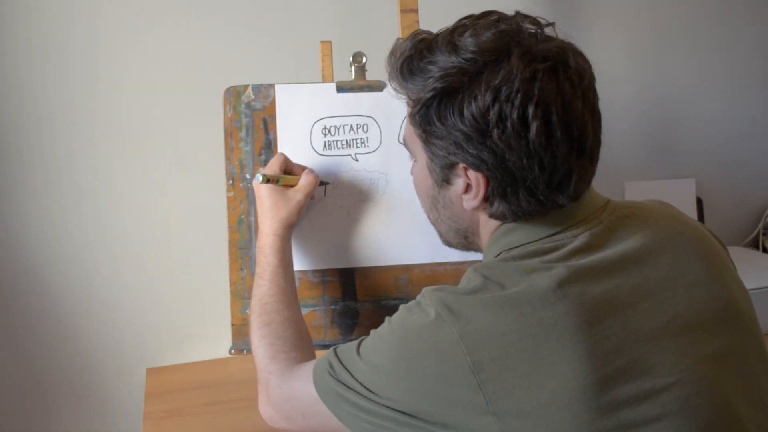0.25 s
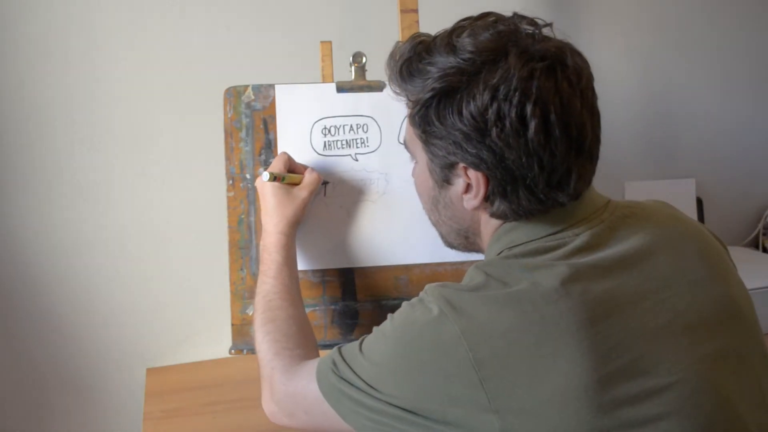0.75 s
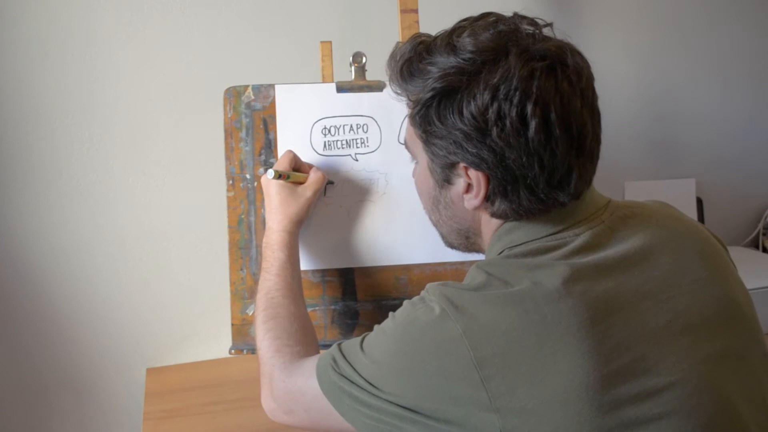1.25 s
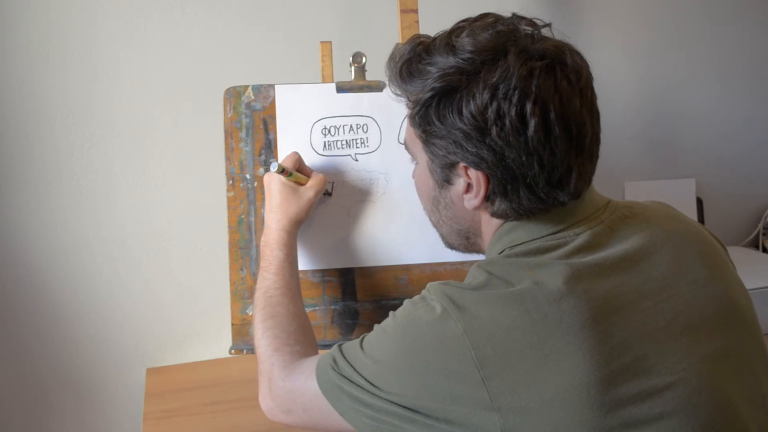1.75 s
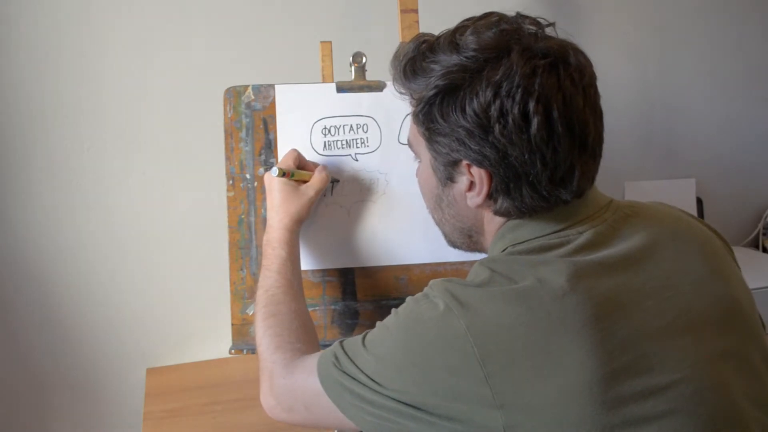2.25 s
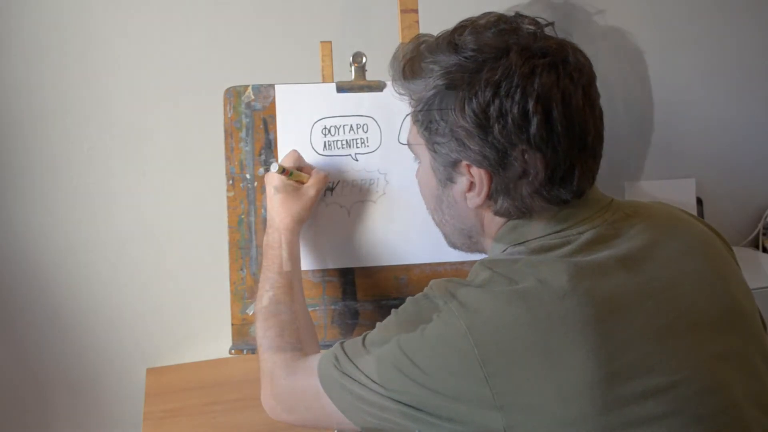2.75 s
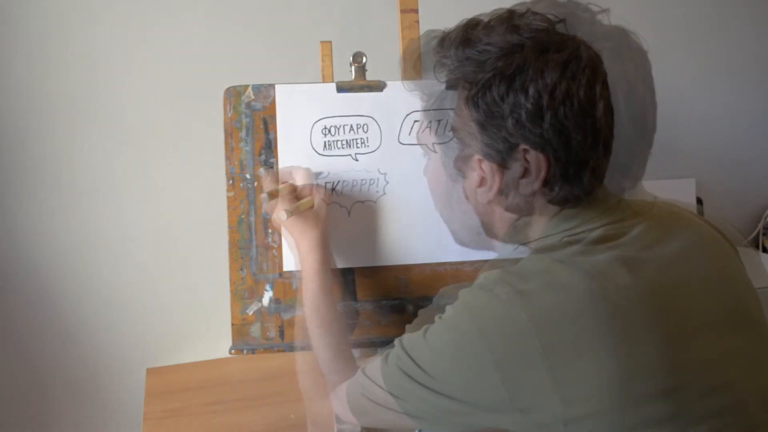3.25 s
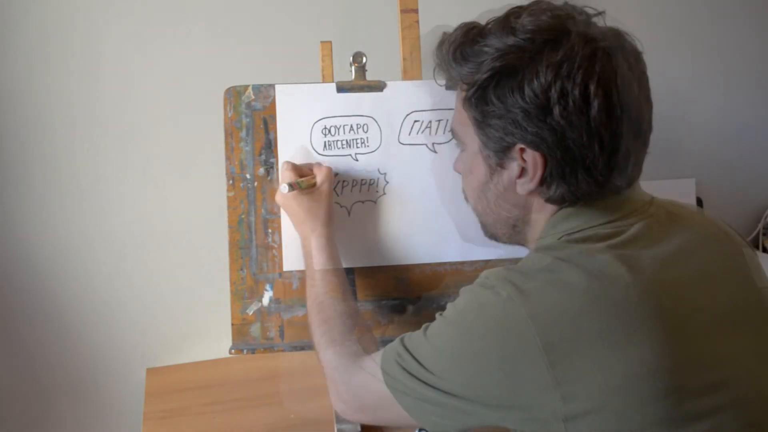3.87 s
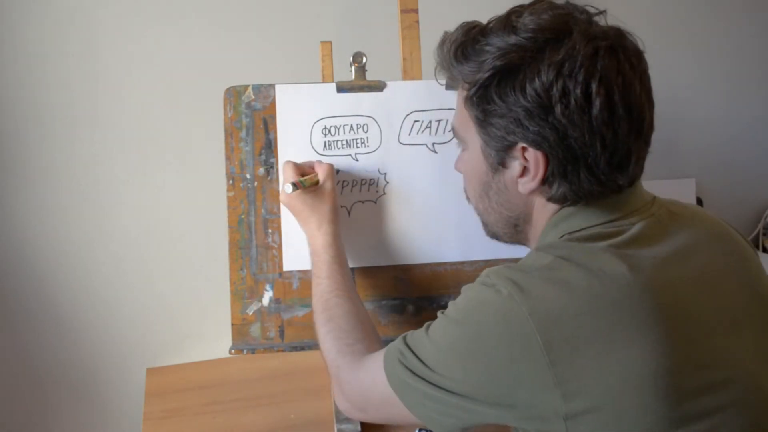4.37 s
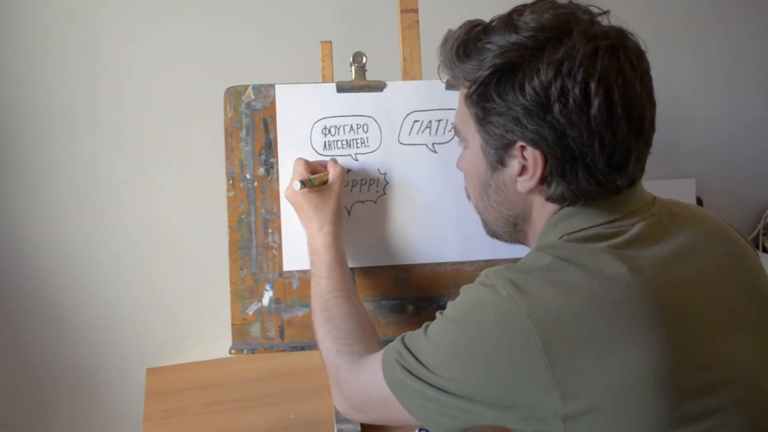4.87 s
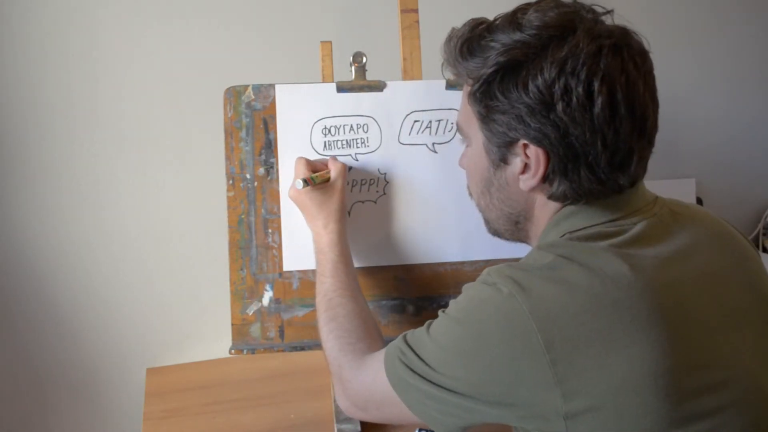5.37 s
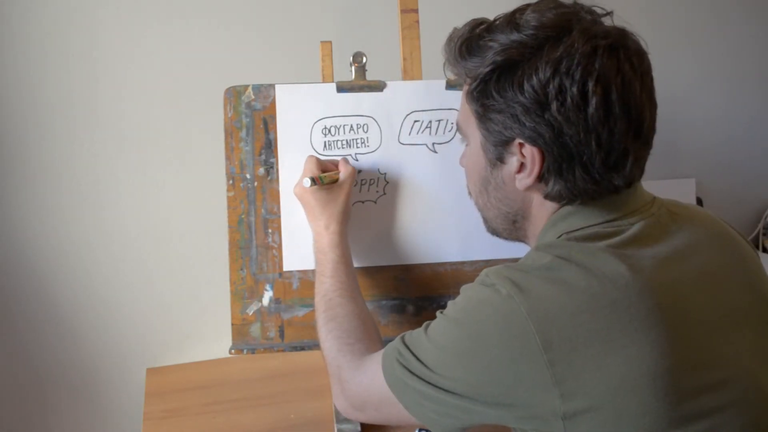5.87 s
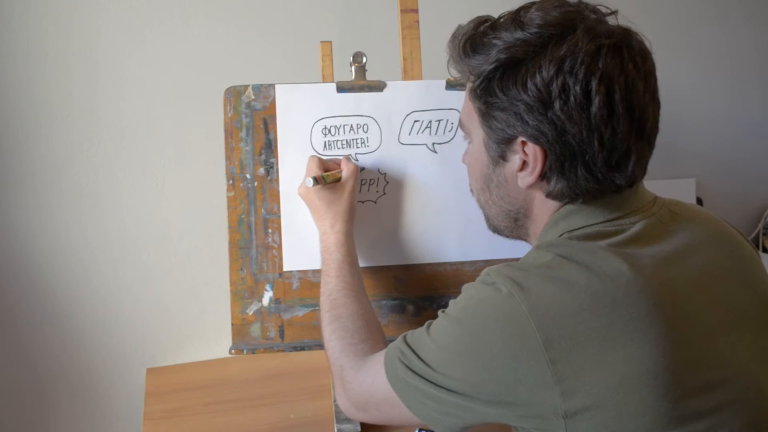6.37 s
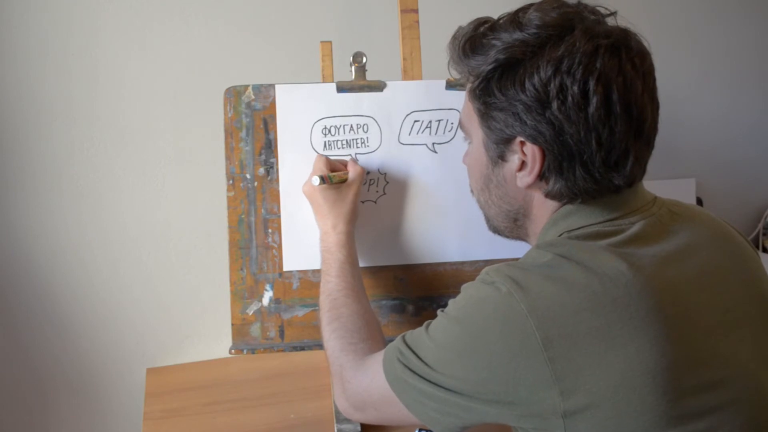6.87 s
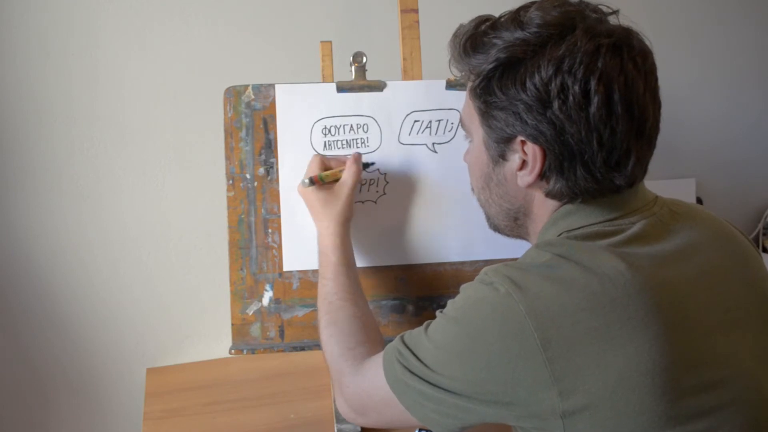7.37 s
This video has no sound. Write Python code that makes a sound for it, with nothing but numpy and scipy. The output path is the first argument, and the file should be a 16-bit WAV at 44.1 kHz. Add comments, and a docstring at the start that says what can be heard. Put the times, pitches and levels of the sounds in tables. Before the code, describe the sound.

A felt-tip marker scratches short dry strokes on board-backed paper in a quiet room, with one sharp knock early, then longer, stronger strokes.

```python
"""A felt-tip marker draws short strokes on paper clipped to a wooden board on an easel, in a small quiet room.
Snags on the paper fibres make noise: it hisses at the nib and, filtered by the board's modes, rings as drag.
Pen and hand knock on the board now and then, once sharply: filtered pushes with a noise rattle.
The hand rubs dully over the sheet. Soft room air and a faint high whirr are shaped noise."""
import sys
import numpy as np
from scipy import signal
from scipy.fft import rfft, irfft
from scipy.io import wavfile

SR = 44100
rng = np.random.default_rng(int(sys.argv[2]) if len(sys.argv) > 2 else 0)


def generate_wav(sig):
    """Save sig (samples, or channels by samples) to the path in sys.argv[1] as 16-bit PCM at SR."""
    pcm = np.round(np.clip(np.atleast_2d(sig).T, -1, 1) * 32767).astype(np.int16)
    wavfile.write(sys.argv[1], SR, pcm)


N = 335772

# Marker strokes; levels are relative. Each row: start in seconds, end in seconds, nib hiss in dB,
# board drag in dB, attack in seconds, release in seconds, pressure gained over the stroke in dB,
# chatter pitch in Hz, chatter in dB against the peak push.
STROKES = [(-.01, 0.081, -62.5, -64, 0.0088, 0.028, -14, 1290, -4),
           (0.672, 0.874, -66.5, -56, 0.023, 0.058, -1.5, 1180, -19),
           (1.419, 1.752, -60, -57.5, 0.017, 0.057, -1, 1020, -18),
           (2.434, 2.739, -63.5, -57.5, 0.087, 0.075, 0, 1230, -7),
           (2.74, 2.96, -75, -67, 0.024, 0.026, -3, 1200, -9),
           (2.938, 3.11, -64.5, -59.5, 0.11, 0.029, -14, 1180, -3),
           (3.355, 3.475, -61.5, -63, 0.0082, 0.056, -2, 5500, -3),
           (3.636, 3.983, -53.5, -47.5, 0.077, 0.033, 3, 2280, -9),
           (4.435, 4.997, -58.5, -49, 0.0087, 0.059, 12, 845, -8.5),
           (5.35, 5.5, -76, -68.5, .01, .01, 7, 845, -2),
           (5.496, 6.022, -59, -49.5, 0.033, .04, 8.5, 845, -5.5),
           (6.549, 7.31, -63.5, -51, 0.028, 0.089, 8.5, 845, -9.5)]
# Pen resonances on which the nib chatters in every stroke.
# Each row: frequency in Hz, level in dB against the nib speed gain.
NIB = [(2200, -8.5), (2930, -2), (5500, -11.5)]
# Spectrum of the nib hiss. Each row: frequency in Hz, relative density in dB per Hz.
HISS_SPECTRUM = [(200, -22), (700, -14), (1300, -7.5), (2200, 1), (3000, 5), (3500, 2), (4600, -2),
                 (5500, 0.5), (6400, -6), (7900, -16), (8600, -8.5), (10000, -9), (14500, -19.5),
                 (16000, -11.5)]
# Filter on the board drag. Each row: frequency in Hz, gain in dB.
DRAG_SPECTRUM = [(80, -37), (200, -18), (290, -2), (380, -9.5), (650, -2), (850, -1), (1200, 1.7),
                 (1900, 0.6), (2900, -3.5), (3600, -5), (5000, -13), (8000, -22), (16000, -67)]
UNSTEADY_DB, UNSTEADY_PER_S = 0.3, 22  # the hand never moves quite evenly


def marker(hiss_db=6.0, drag_db=1.5, nib_chatter_db=0.0):
    """Each stroke hisses at the nib, drives the board and chatters on its own pitch, most where pressed hardest."""
    speed, pressure, stroke_tone = np.zeros((3, N))
    t = np.arange(N) / SR
    for start, end, *shape, chatter_hz, chatter_db in STROKES:
        span = (t >= start) & (t < end)
        nib, push = stroke_gains(t[span], start, end, *shape)
        speed[span] += nib
        pressure[span] += push
        tone_gain = from_db(chatter_db) * push ** 2 / push.max()
        stroke_tone[span] += tone_gain * chatter(chatter_hz, size=SR)[-len(push):]
    nib_tone = sum(from_db(db + nib_chatter_db) * chatter(hz, size=N) for hz, db in NIB)

    nib_slips = fibre_slips(per_s=14000, spread_db=7.0, clump_db=3.5)
    hiss = rms_one(colour(nib_slips, HISS_SPECTRUM))
    drag_slips = fibre_slips(per_s=3000, spread_db=1.0, clump_db=2.5)
    drag = rms_one(colour(board(drag_slips, ring_db=23), DRAG_SPECTRUM))

    at_nib = speed * (from_db(hiss_db) * hiss + nib_tone)
    on_board = from_db(drag_db) * pressure * drag
    unsteady = from_db(UNSTEADY_DB * drift(UNSTEADY_PER_S))
    return unsteady * (at_nib + on_board + stroke_tone)


TOUCH_S, TOUCH_SHARE = 0.0047, 0.43  # landing time; share of full speed at which the attack starts
HISS_FOLLOWS = .27  # share of the pressure swing (in dB) that the hiss follows
ARCH_DB = 3.5  # pressure in mid-stroke above that at the ends


def stroke_gains(t, start, end, hiss_db, drag_db, attack_s, release_s, build_db):
    """The nib lands, speeds up, holds and lifts off while the pressure changes: gains of hiss and drag."""
    landed = np.clip((t - start) / TOUCH_S, 0, 1)
    speeding_up = np.clip(TOUCH_SHARE + (1 - TOUCH_SHARE) * (t - start) / attack_s, 0, 1)
    lifting_off = np.clip((end - t) / release_s, 0, 1)
    speed = landed * speeding_up * lifting_off
    progress = np.clip((t - start) / (end - start), 0, 1)
    press_db = build_db * (progress - .5) + ARCH_DB * (np.sin(np.pi * progress) - .5)
    return speed * from_db(hiss_db + HISS_FOLLOWS * press_db), speed * from_db(drag_db + press_db)


def fibre_slips(per_s, spread_db, clump_db):
    """Felt snags and lets go: dense clicks of uneven size, clumped by the tooth of the paper."""
    slips = (rng.random(N) < per_s / SR) * rng.standard_normal(N)
    return slips * from_db(spread_db * rng.standard_normal(N) + clump_db * drift(180))


def chatter(hz, size, relative_width=0.042):
    """Stick and slip lock loosely onto a resonance of pen or board: a rough, faint tone."""
    width_hz = relative_width * hz
    narrow = resonance(rng.standard_normal(size), hz, width_hz)
    return rms_one(resonance(narrow, hz, 4 * width_hz))


# Modes of board and easel.
# Each row: frequency in Hz, level in dB before weighting by t60, t60 in seconds.
BOARD_MODES = [(95.6, -2.5, 0.59), (170.7, -6.5, 0.43), (279, -9, 0.13), (288, -2.5, 0.037),
               (310, -6.5, 0.23), (402, -3, 0.26), (458.8, -1.5, 0.35), (540, -5.5, 0.36), (558, -12, 0.21),
               (710, -17, 0.11), (730, -8.5, 0.16), (845, -16.5, 0.63), (918, 5, 0.049), (1030, 7, 0.04),
               (1078, -10, 0.36), (1173.6, 2.5, 0.096), (1290, -25, 0.07), (1407, -3.5, 0.17),
               (1470, -8, 0.053), (1610, -5.5, 0.065), (2200, -5, 0.026), (2878, 16, 0.017)]


def board(force, ring_db):
    """The sheet radiates the force at once; the board rings on in its modes."""
    rings = np.zeros(len(force))
    for hz, db, t60 in BOARD_MODES:
        width_hz = np.log(1000) / (np.pi * t60)
        rings += from_db(db) * t60 * resonance(force, hz, width_hz)
    return force + from_db(ring_db) * rings


# Knocks on the board. Each row: time in seconds, relative strength in dB, contact brightness in Hz,
# rattle in dB against the push, rattle decay to 1/e in seconds.
KNOCKS = [(.14, -44, 5100, 10.5, 0.011), (1.523, -20, 3320, 4, 0.018), (1.5245, -11.5, 900, 3.5, 0.027),
          (1.525, -15, 190, 10, 0.037), (2.055, -21.5, 1130, 5.5, 0.0073),
          (2.2518, -17.5, 4420, 7.5, 0.006), (2.2759, 2.5, 920, -6.5, 0.0027),
          (2.2823, 6, 540, -1.5, 0.017), (2.834, -20.5, 700, 3, 0.015), (3.6425, -35.5, 6500, -1, 0.0063),
          (4.038, -25.5, 3720, 2.5, .017), (4.048, -26, 170, 5, 0.026), (5.369, -32.5, 3800, 2.5, 0.012),
          (6.085, -44, 7000, 9, 0.022), (6.462, -47, 7000, 7, 0.018), (6.641, -36, 4000, 6, 0.0065),
          (7.371, -35.5, 4000, -1, .007)]
# Filter on the knocks. Each row: frequency in Hz, gain in dB.
KNOCK_SPECTRUM = [(40, -40), (70, -27), (100, -21), (170, -11.5), (290, 2), (450, -1), (900, 3.5),
                  (1600, 1.5), (3000, 3), (5500, -2), (9000, -2.5), (16000, 5)]


def knocks(level_db=8):
    """A push as short as the contact is hard, then a brief rattle of pen and loose sheet."""
    force = np.zeros(N)
    t = np.arange(SR // 5) / SR
    for s, db, bright_hz, rattle_db, rattle_s in KNOCKS:
        rattle = rng.standard_normal(len(t)) * np.exp(-t / rattle_s)
        push = -1.0 * (t == 0)
        blow = push + from_db(rattle_db) * rattle / np.linalg.norm(rattle)
        blow = signal.sosfilt(signal.butter(2, min(bright_hz, SR / 3), fs=SR, output="sos"), blow)
        start = round(s * SR)
        force[start:start + len(t)] += from_db(db) * blow[:N - start]
    return from_db(level_db) * colour(board(force, ring_db=17.0), KNOCK_SPECTRUM)


# Shifts of the hand over the sheet. Each row: middle in seconds, length in seconds, relative level in dB.
HAND_SHIFTS = [(0.015, 0.12, -60.5), (0.219, 0.25, -57.5), (0.724, 0.42, -68.5), (1.113, 0.2, -71),
               (1.566, .16, -55.5), (2.87, 0.15, -61), (4.07, 0.18, -63), (7.417, 0.5, -70)]
# Filter on the hand rub. Each row: frequency in Hz, gain in dB.
RUB_SPECTRUM = [(50, -28), (140, 3.5), (300, 2), (700, -3), (1400, -10), (4000, -23), (16000, -52)]


def hand():
    """The side of the hand rubs dully over the paper, one smooth swell for each shift."""
    t = np.arange(N) / SR
    motion = np.zeros(N)
    for middle, length, db in HAND_SHIFTS:
        motion += from_db(db) * np.cos(np.pi * np.clip((t - middle) / length, -.5, .5))
    rub = fibre_slips(per_s=3500, spread_db=5.0, clump_db=1.5)
    return motion * rms_one(colour(rub, RUB_SPECTRUM))


# Spectrum of the room air. Each row: frequency in Hz, relative density in dB per Hz.
AIR_SPECTRUM = [(25, -14.5), (60, -11.5), (110, -2), (330, 1.5), (700, 2), (1400, 0), (2000, -2.5),
                (3400, -10.5), (5000, -13), (7000, -22.5), (10000, -29.5), (16000, -40.5)]
# Resonances of the whirr.
# Each row: frequency in Hz, half the width in Hz of each of two passes, relative level in dB.
WHIRR = [(2710, 105, 6), (2780, 78, -10), (3097, 95, 4.5), (3613, 68, 3.5), (4410, 180, -6),
         (4680, 57, -7.5)]
DIP_AT_S, DIP_WIDTH_S, DIP_DB = 3.31, 0.45, -3.3


def background(air_db=-64.0, whirr_db=-66.5):
    """Soft room air and a steady whirr of noise in narrow resonances; the level dips once."""
    t = np.arange(N) / SR
    air = rms_one(colour(rng.standard_normal(N), AIR_SPECTRUM))
    whirr = np.zeros(N)
    for hz, width_hz, db in WHIRR:
        band = resonance(rng.standard_normal(N), hz, 2 * width_hz)
        whirr += from_db(db) * resonance(band, hz, 2 * width_hz)
    dip = from_db(DIP_DB * np.exp(-((t - DIP_AT_S) / DIP_WIDTH_S) ** 2))
    return dip * (from_db(air_db) * air + from_db(whirr_db) * rms_one(whirr))


def room(x, level_db=-4.0, turns_per_s=1.5, shadow_hz=500, shadow_left=0.7):
    """Direct sound, dulled by the body in its way, plus reflections that turn between two patterns."""
    shadowed = signal.lfilter(*signal.butter(1, shadow_hz, fs=SR), x)
    direct = shadow_left * x + (1 - shadow_left) * shadowed
    angle = 2 * np.pi * turns_per_s * np.arange(N) / SR
    echoes = np.zeros(N)
    for share in (np.cos(angle), np.sin(angle)):
        echoes += signal.oaconvolve(x * share, reflections())[:N]
    return from_db(level_db) * (direct + echoes)


# Reverberation. Each row: frequency in Hz, t60 in seconds.
ROOM_DECAY = [(100, 0.66), (500, 0.3), (2000, 0.39), (6000, 0.36), (14000, 0.3)]


def reflections(tail_db=0, early_db=-3, early_s=0.0069, gap_s=0.0013, bass_hz=380):
    """Near echoes and a diffuse tail whose decay depends on frequency; both are weak in the bass."""
    t = np.arange(SR // 2) / SR
    hz, when, cells = signal.stft(rng.standard_normal(len(t)), SR, nperseg=256)
    decay = 1000. ** (-when / at_hz(ROOM_DECAY, hz)[:, None])
    tail = signal.istft(cells * decay, SR)[1][:len(t)]
    early = rng.standard_normal(len(t)) * np.exp(-t / early_s)
    echoes = from_db(tail_db) * tail / np.linalg.norm(tail)
    echoes += from_db(early_db) * early / np.linalg.norm(early)
    echoes *= np.clip(t / gap_s - 1, 0, 1)  # silent for gap_s, full after twice that
    return signal.sosfilt(signal.butter(2, bass_hz, "high", fs=SR, output="sos"), echoes)


def from_db(db):
    """Decibels to gain."""
    return 10 ** (np.asarray(db) / 20)


def rms_one(x):
    """Scale to unit rms."""
    return x / np.sqrt(np.mean(x ** 2) + 1e-20)


def at_hz(points, hz):
    """Read a table on a log-frequency axis."""
    points = np.array(points)
    return np.interp(np.log(hz + 1e-6), np.log(points[:, 0]), points[:, 1])


def colour(x, points, size=4096):
    """Causal (minimum-phase) filter with the given spectrum."""
    gain = from_db(at_hz(points, np.fft.rfftfreq(size, 1 / SR)))
    cepstrum = irfft(np.log(gain))
    cepstrum[1:size // 2] *= 2  # fold onto positive times
    cepstrum[size // 2 + 1:] = 0
    return signal.oaconvolve(x, irfft(np.exp(rfft(cepstrum))))[:N]


def drift(per_s):
    """Smooth random wandering of unit rms through per_s random points a second."""
    place = np.arange(N) / SR * per_s
    return rms_one(np.interp(place, np.arange(N), rng.standard_normal(N)))


def resonance(x, hz, width_hz):
    """Two-pole resonance with gain 1 on top."""
    r = np.exp(-np.pi * width_hz / SR)
    zeros = np.array([1, 0, -1]) * (1 - r * r) / 2
    poles = [1, -2 * r * np.cos(2 * np.pi * hz / SR), r * r]
    return signal.lfilter(zeros, poles, x + 1e-18)


def scene():
    """The drawing heard from a little way off."""
    return (room(marker() + knocks() + hand()) + background())[None]


# Response of the microphone. Each row: frequency in Hz, gain in dB.
MICROPHONE = [(9800, 0.5), (10600, -6), (11300, -15), (12200, -20), (13000, -7.5), (14200, 5), (15500, -3)]
CUTOFF_HZ = 15700


def record(dry, self_noise_db=-97):
    """The microphone has a deep dip in the top octave and a trace of hiss; the top is cut."""
    heard = colour(dry[0], MICROPHONE) + from_db(self_noise_db) * rng.standard_normal(N)
    return signal.sosfilt(signal.ellip(12, .1, 80, CUTOFF_HZ, fs=SR, output="sos"), heard)[None]


dry = scene()
out = record(dry)
generate_wav(out)
```